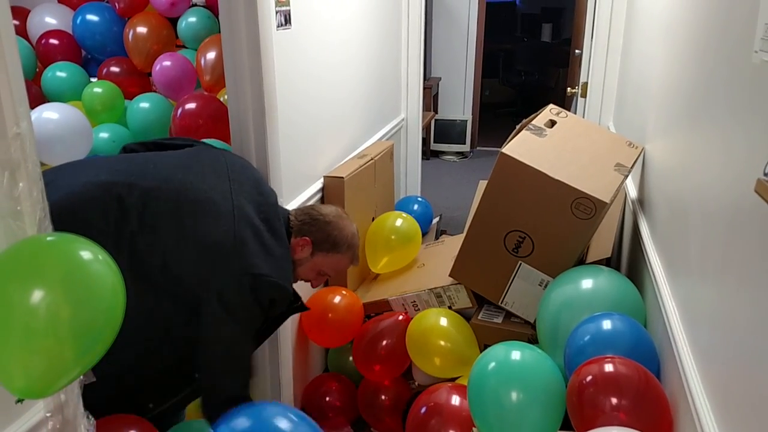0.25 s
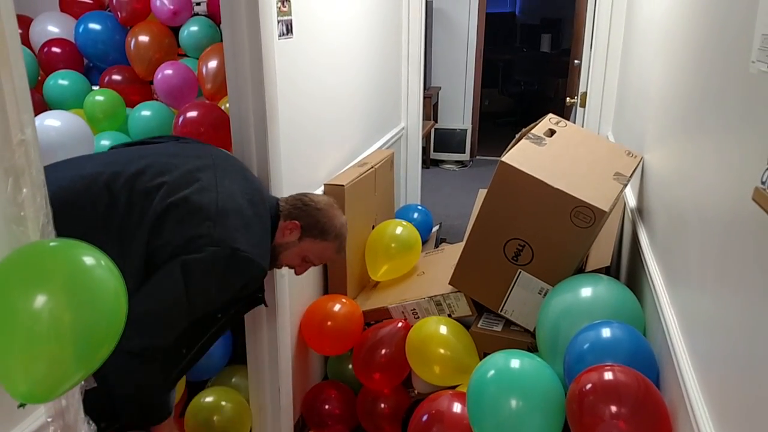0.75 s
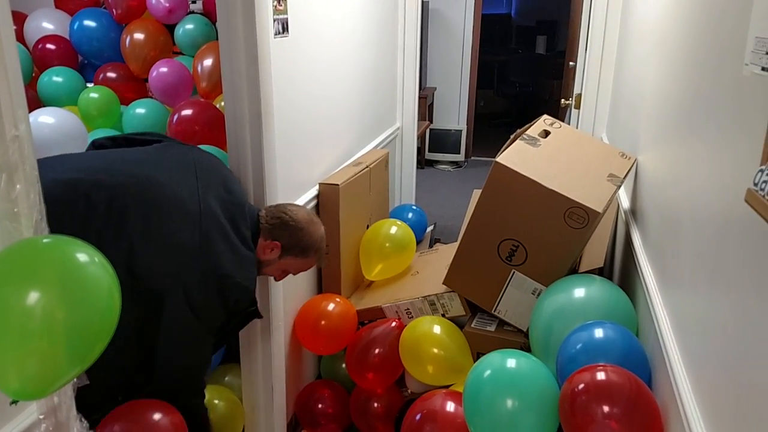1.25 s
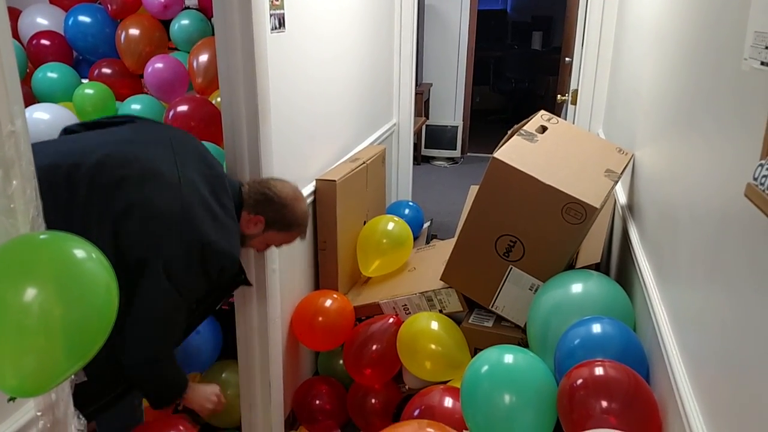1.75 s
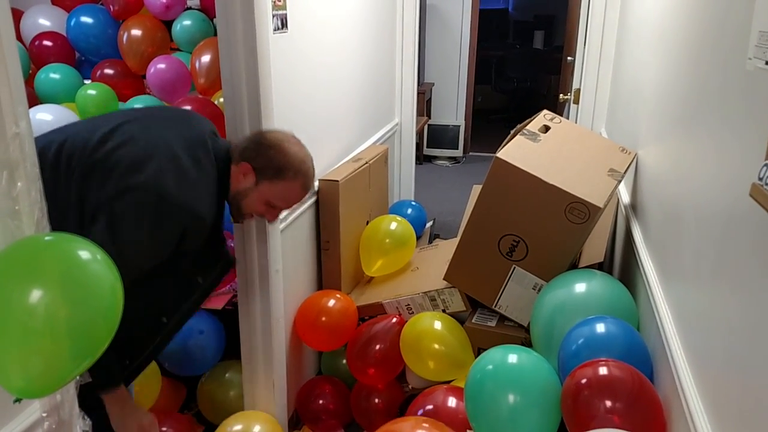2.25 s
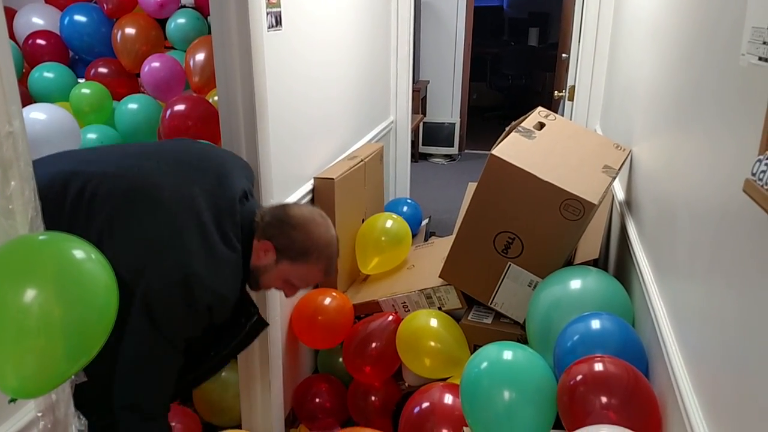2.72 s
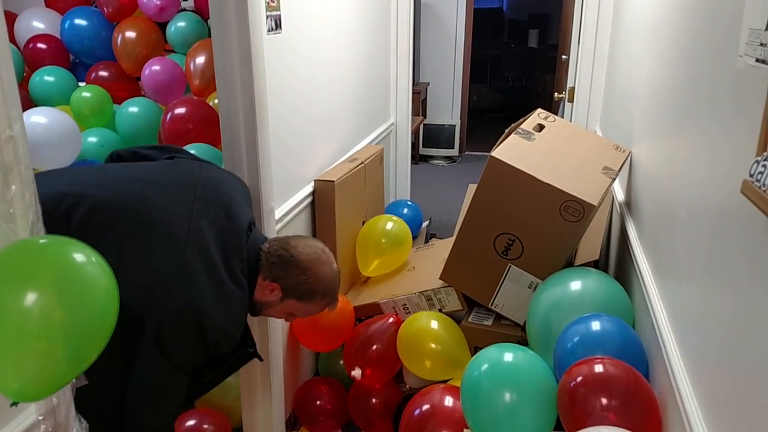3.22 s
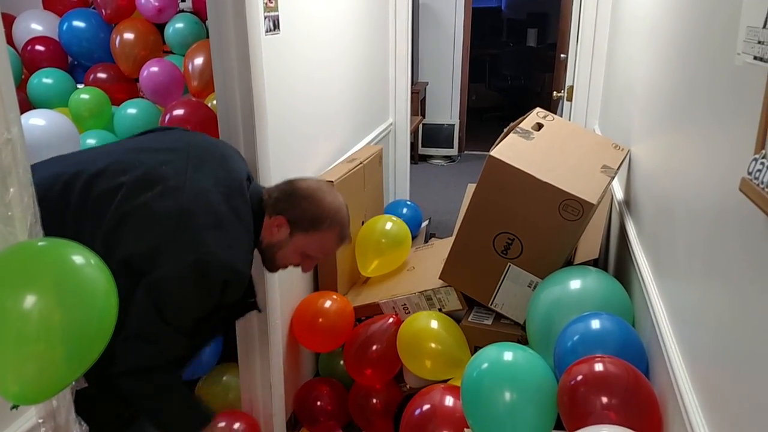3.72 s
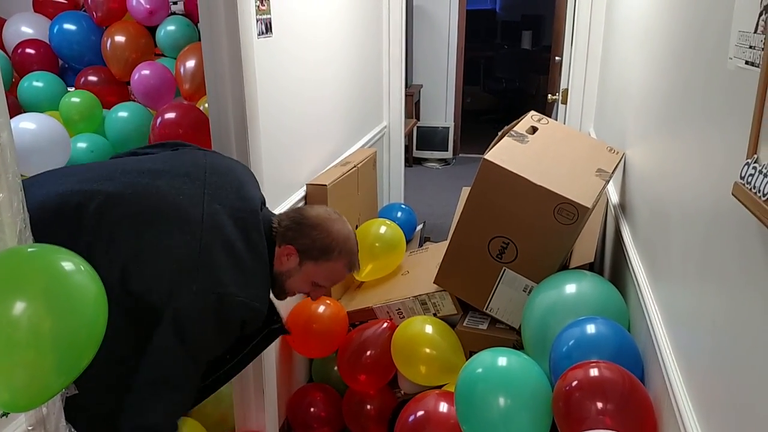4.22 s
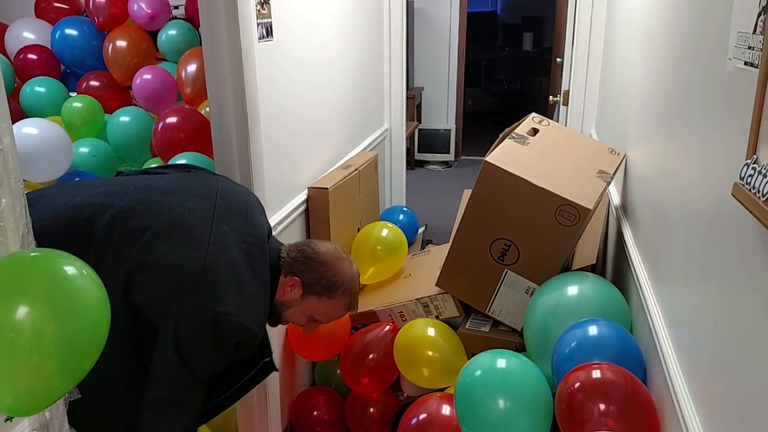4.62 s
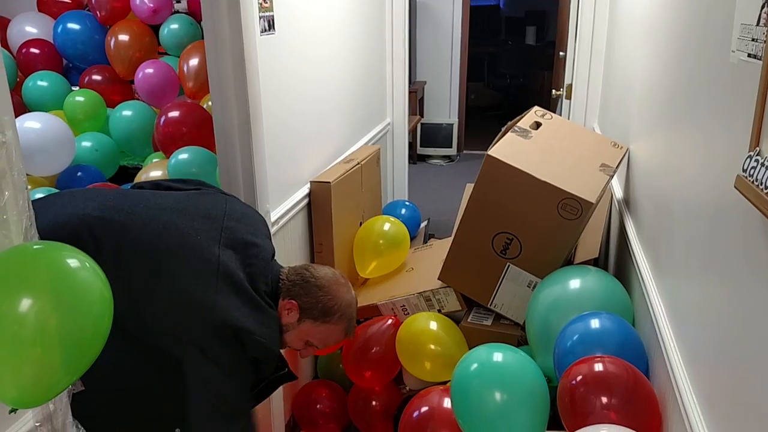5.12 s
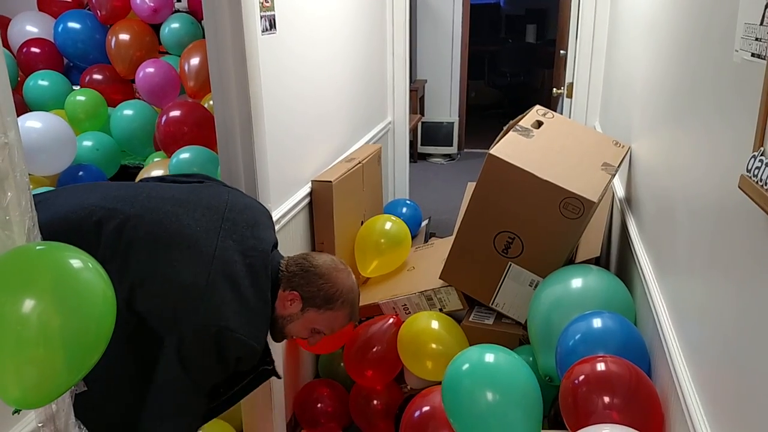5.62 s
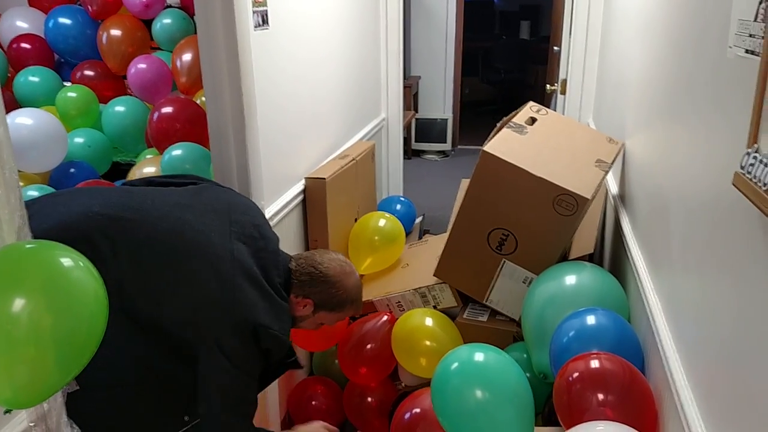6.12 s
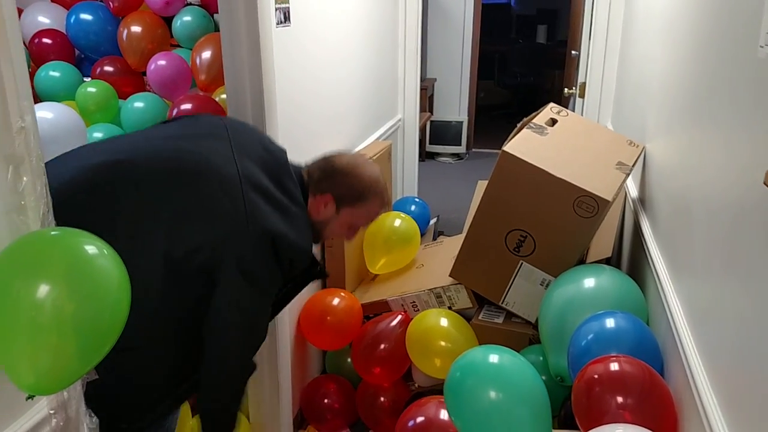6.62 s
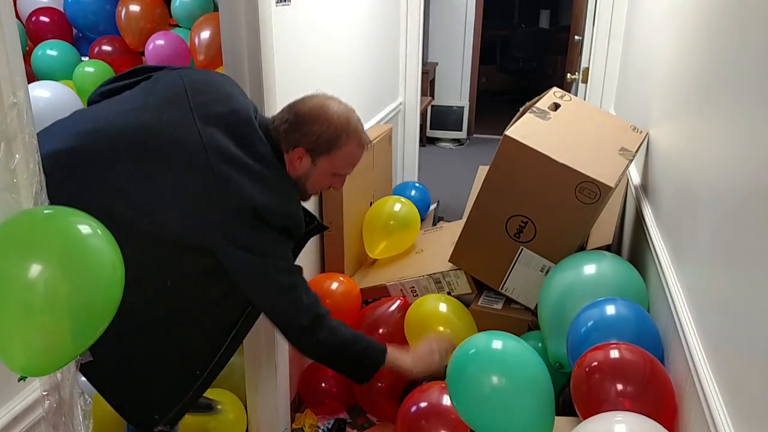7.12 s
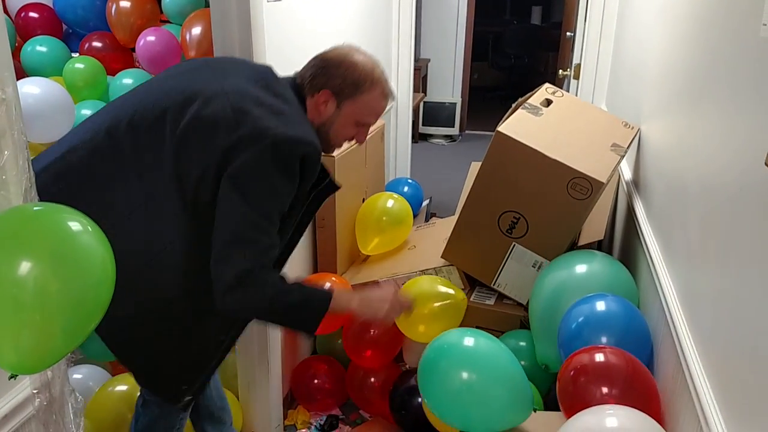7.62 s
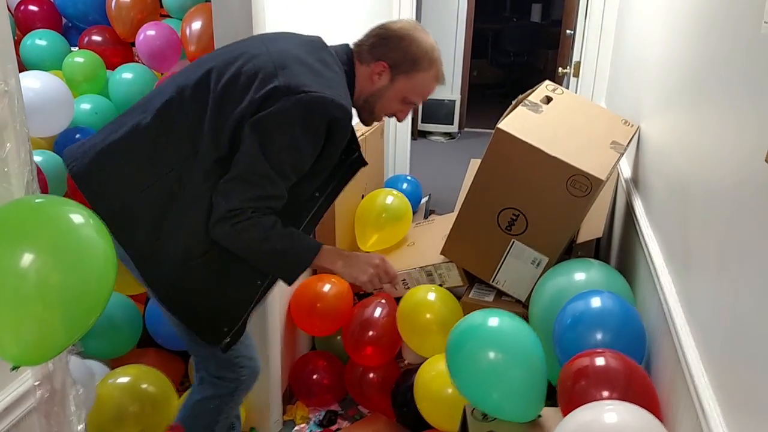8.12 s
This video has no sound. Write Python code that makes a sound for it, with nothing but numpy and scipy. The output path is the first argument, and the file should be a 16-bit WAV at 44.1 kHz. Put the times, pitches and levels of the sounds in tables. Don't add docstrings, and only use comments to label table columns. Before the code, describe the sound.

In a narrow hard-walled corridor, balloons are popped by hand near the floor, roughly every quarter to third of a second. Each is a hard, punchy bang with close wall slaps and a short dense tail. Faint rubber and cloth rustle lies between. After a pause, a final loud burst, then small ticks. The close, cheap microphone clips the bangs and mutes near-silence.

```python
import sys
import numpy as np
from scipy import signal
from scipy.fft import rfft, irfft
from scipy.io import wavfile
from scipy.ndimage import uniform_filter1d

SR = 44100
rng = np.random.default_rng(int(sys.argv[2]) if len(sys.argv) > 2 else 0)


def invert_db(x):
    u = np.asarray(x, float) / 20
    return 10 ** u


def digitize_waveform(pressure):
    field = np.atleast_2d(pressure).T
    bounded = np.clip(field, -1, 1)
    quanta = np.round(bounded * 32767).astype(np.int16)
    wavfile.write(sys.argv[1], SR, quanta)


N = 368676


def evened(x):
    return x / np.sqrt(np.mean(x ** 2) + 1e-20)


def read(points, hz):
    f, value = np.transpose(points)
    return np.interp(np.log(hz + 1), np.log(f + 1), value)


def add(mix, s, sound):
    at = round(s * SR)
    part = mix[max(at, 0):][:len(sound) + min(at, 0)]
    part += sound[max(-at, 0):][:len(part)]


def coloured(points):
    spectrum = rfft(rng.standard_normal(N))
    gain = invert_db(read(points, np.fft.rfftfreq(N, 1 / SR)))
    return evened(irfft(spectrum * gain, N))


def at_burst(rows, s, usual):
    return next((row[1:] for row in rows if abs(row[0] - s) < .05), usual)


def swing(squeeze_s, suck_s):
    t = np.arange(400) / SR
    push = np.sin(np.pi * np.clip(t / squeeze_s, 0, 1))
    suck = np.sin(np.pi * np.clip((t - squeeze_s) / suck_s, 0, 1) ** 0.79)
    return suck - push


# (delay [s], level [dB])
WALL_SLAPS = [
    (0, 4),
    (.0027, -17),
    (.0041, 3),
    (.0078, -13),
    (0.0117, -12.5),
    (.0168, -11),
    (.021, -12),
    (0.0257, -11),
    (0.0313, -13.5),
    (0.03, -19),
]


def slaps(body_db, front_db, spacing, echo_db, wobble):
    haste = invert_db(-.13 * body_db)
    pulse = swing(0.0013 * haste, 0.0024 * haste)
    out = np.zeros(2400)
    for (delay, db), (late, loud_db) in zip(WALL_SLAPS, wobble):
        level_db = db + (echo_db + 1.7 * loud_db) * (delay > 0)
        add(out, delay * (spacing + .006 * late), invert_db(level_db) * pulse)
    front_hz = np.clip(1200 * invert_db(front_db), 300, 9000)
    out = signal.sosfilt(signal.butter(1, front_hz, fs=SR, output="sos"), out)
    return signal.sosfilt(signal.butter(2, 80, "highpass", fs=SR, output="sos"), out)


BAND_CENTRES = (260, 550, 1050, 1900, 3300, 7500)
# (frequency [Hz], density [dB per Hz])
TAIL_SPECTRUM = [(40, -37), (100, -21.5), (160, -3.5), (225, -0.5), (270, -1), (340, -5), (450, -10.5),
                 (570, -12), (900, -17.5), (1400, -23.5), (2100, -25.5), (3500, -39.5), (7000, -47.5),
                 (15500, -56.5)]
# (frequency [Hz], t60 [s])
CORRIDOR_DECAY = [(60, 0.2), (160, .26), (260, 0.26), (500, 0.2), (1100, 0.17), (2200, 0.17), (4000, 0.15),
                  (8000, 0.18), (14000, 0.098)]


def tail(colour_db, ring_hz, ring_db, noise, rise_s):
    hz = np.fft.rfftfreq(len(noise), 1 / SR)
    shape = invert_db(read(TAIL_SPECTRUM, hz))
    ring = ring_db * np.exp(-(np.log((hz + 1) / ring_hz) / 0.18) ** 2)
    colour = invert_db(read(list(zip(BAND_CENTRES, colour_db)), hz) + ring)
    x = irfft(rfft(noise) * shape / np.sqrt(np.mean(shape ** 2)) * colour)

    hz, t, z = signal.stft(x, SR, nperseg=128, noverlap=112)
    hz = hz[:, None]
    build = 1 - np.exp(-(t + 0.00017) / (rise_s + 0.0045 * (250 / (hz + 60)) ** 1.5))
    early = 1 + invert_db(9) * np.exp(-t / 0.0061) * hz / (hz + 2500)
    fall_db = -60 * t / (0.94 * read(CORRIDOR_DECAY, hz))
    further_rooms = invert_db(-14 + fall_db / 1.966)
    decay = np.hypot(early * invert_db(fall_db), further_rooms)
    x = signal.istft(z * build * decay, SR, nperseg=128, noverlap=112)[1]
    return x * np.clip(np.arange(len(x)) / (0.00025 * SR), 0, 1)


# (time [s], thump [dB], tail [dB re thump], body [dB re tail], fizz [dB re tail])
BURSTS = [(-.03, -2, -14.5, -8, -28.5), (0.252, -0.2, -14, -13.5, -33.5), (0.5436, -2, -17, -2, -22.5),
          (0.838, -1.5, -20, 0, -21.5), (1.1307, -3.5, -11, -9, -35.5), (1.426, -15, -7, -11.5, -35),
          (1.7371, -2, -15, -4, -29), (2.422, 0, -19.5, 1, -23), (2.7279, -2, -14.5, -8.5, -32),
          (3.0081, -1, -16, -11.5, -30.5), (3.2457, -3, -12, -7.5, -32.5), (3.4664, 0, -15, -12, -30.5),
          (3.8562, 4, -17, -6.5, -24.5), (4.5654, -1.5, -15, -4.5, -27), (4.8379, -5.5, -11, -12, -36.5),
          (5.1402, 0.9, -17, -7, -31), (5.3965, -1, -16.5, -11, -30.5), (5.6563, -2, -14, -11, -33),
          (5.962, -0.5, -10.5, -12, -32), (6.332, -1.5, -18.5, -3.5, -28), (7.284, 4.5, -20.5, -6.5, -25.5)]
# (time [s], ring frequency [Hz], boost [dB])
SKIN_FLAPS = [(.25, 1568, 9.5), (.54, 3136, 6.5), (1.43, 790, 10.5), (.84, 558.2, 3), (3.25, 2290, 6),
              (3.86, 3330, 4), (5.96, 2894, 5.5), (1.74, 2927, 5.5), (2.42, 2260, 6.5), (2.73, 1838, 7.5),
              (3.01, 1520, 5.5), (3.47, 1936, 7), (5.4, 1276, 9), (5.66, 1472, 8), (6.33, 2406, 6.5),
              (7.28, 2160, 3.5)]
# (time [s], echo spacing [factor], echo level [dB])
BURST_SPOTS = [
    (.54, 0.98, -0.5),
    (.84, 0.94, -5.5),
    (1.43, 0.9, 2),
    (2.42, 1.04, -3.5),
    (3.25, 0.955, 0.5),
    (4.57, 0.94, 0),
    (6.33, 1.04, -2.5),
    (7.28, 0.82, -3.5),
]


def pops():
    usual_body_fizz_db = (-5, -30)
    out = np.zeros(N)
    for s, thump_db, tail_db, *colour in BURSTS:
        body_db, fizz_db = np.array(colour) - usual_body_fizz_db
        crack_db = -1.34 + 0.8 * fizz_db
        snap_db = (crack_db + fizz_db) / 2 + 0.5
        front_db = 1.9 + .5 * body_db + .8 * fizz_db
        ring_hz, ring_db = at_burst(SKIN_FLAPS, s, (1400, 2.5))
        spacing, echo_db = at_burst(BURST_SPOTS, s, (1.04, 0))
        colour_db = [0, body_db, body_db, crack_db, snap_db, fizz_db]
        wobble = rng.standard_normal((len(WALL_SLAPS), 2))
        noise = rng.standard_normal(22050)
        rise_s = .00045 * invert_db(-1.6 * front_db)
        sound = invert_db(tail_db + 8.5) * tail(colour_db, ring_hz, ring_db, noise, rise_s)
        add(sound, 0, invert_db(-3.5) * slaps(body_db, front_db, spacing, echo_db, wobble))
        add(out, s - .0002, invert_db(thump_db) * sound)
    return out


# (frequency [Hz], density [dB per Hz])
RUSTLE_SPECTRUM = [(30, -13), (80, -4.5), (160, 5), (260, -2.5), (500, -15), (1000, -21), (2500, -33),
                   (8000, -47.5), (16000, -56)]
# (frequency [Hz], density [dB per Hz])
RUMBLE_SPECTRUM = [(8, -4), (25, 0), (50, -6), (100, -7.5), (300, -47.5)]
# (middle [s], length [s], level [dB])
REACHES = [(0, .9, -54.5), (.8, .9, -63), (1.499, 1.1, -53.5), (2.222, 0.087, -65.5), (2.197, 0.68, -63.5),
           (3.2, 2.1, -58.5), (4.001, 0.45, -66), (4.306, 0.26, -53), (4.85, 0.93, -54), (5.8, 2, -57.5),
           (6.81, .26, -56.5), (6.995, 0.297, -60), (7.145, 0.19, -53), (7.4, .6, -56.5),
           (7.697, 0.34, -61.5), (7.949, .26, -57.5), (8.105, .3, -58.5), (8.36, .4, -56)]


def shuffle():
    lumps = uniform_filter1d(rng.standard_normal(N), size=900)
    lumps = evened(uniform_filter1d(lumps, size=900))
    t = np.arange(N) / SR
    swells = [invert_db(db) * np.cos(np.pi * np.clip((t - s) / length, -.5, .5)) for s, length, db in REACHES]
    still = invert_db(-65)
    level_db = 10 * np.log10(still ** 2 + np.sum(np.square(swells), axis=0))
    rustle = coloured(RUSTLE_SPECTRUM) * invert_db(level_db + 0.83 * lumps)
    rumble = coloured(RUMBLE_SPECTRUM) * invert_db(-60.0 + .5 * (level_db + 59.5))
    return rustle + rumble


# (time [s], level [dB], decay [s])
SKIN_RIPS = [
    (0, -17.5, 0.0018),
    (0.2466, -32.5, .006),
    (2.7277, -37, 0.0036),
    (3.2484, -45, 0.0026),
]
# (time [s], level [dB])
SCRAP_TICKS = [(6.7654, -62.5), (6.897, -51), (6.955, -60), (7.0794, -56), (7.1587, -63), (7.5198, -65),
               (7.5341, -60), (7.554, -61.5), (7.6086, -56), (7.651, -67), (7.7597, -79), (7.7767, -57),
               (7.8161, -57), (7.8608, -64), (7.9542, -62), (7.9775, -57.5), (8.095, -58.5),
               (8.2252, -57.5), (8.2648, -60)]


def tears():
    out = np.zeros(N)
    ticks = [(s, db - 0.5, .0015) for s, db in SCRAP_TICKS]
    for s, db, decay_s in SKIN_RIPS + ticks:
        rip = evened(signal.lfilter([1], [1, -.8], rng.standard_normal(600)))
        add(out, s, invert_db(db) * rip * np.exp(-np.arange(600) / (decay_s * SR)))
    return out


def scene():
    return (pops() + shuffle() + tears())[None]


# (time [s], slow sag [dB], recovery [s], quick kick [dB])
BIAS_SAGS = [
    (3.86, -18, 0.025, -19.5),
    (7.29, -15, 0.018, -3.5),
]


def sag():
    t = np.arange(SR // 2) / SR
    out = np.zeros(N)
    kick_hz, kick_s = 114, 0.0094
    kick = np.exp(-t / kick_s) * np.cos(2 * np.pi * kick_hz * t)
    onset = 1 - np.exp(-t / 0.00032)
    for s, db, back_s, kick_db in BIAS_SAGS:
        add(out, s, -(invert_db(db) * np.exp(-t / back_s) + invert_db(kick_db) * kick) * onset)
    return out


def top_cut(x):
    return signal.sosfilt(signal.butter(12, 15600, fs=SR, output="sos"), x)


# (frequency [Hz], density [dB per Hz])
BIAS_DRIFT = [(1, -1), (15, 1.5), (35, -8), (70, -19), (200, -50)]


def record(dry):
    x = dry * np.clip((abs(dry) / invert_db(-59) - 1) * 6, 0, 1)
    x = signal.sosfilt(signal.butter(1, 4500, fs=SR, output="sos"), x)
    x = signal.sosfilt(signal.butter(2, 100, "highpass", fs=SR, output="sos"), x)
    x = x + sag() + invert_db(-69) * coloured(BIAS_DRIFT)
    x = signal.sosfilt(signal.butter(2, .55, "highpass", fs=SR, output="sos"), x)
    x = np.clip(x, -1, 1) + invert_db(-101.5) * rng.standard_normal(x.shape)
    return top_cut(x)


dry = scene()
out = record(dry)
digitize_waveform(out)
```